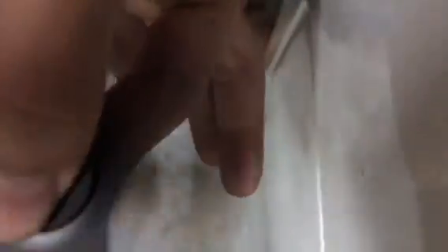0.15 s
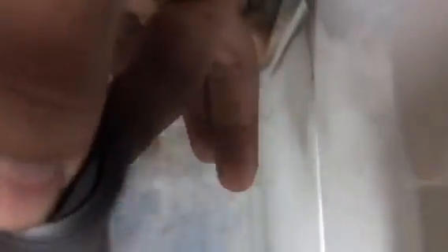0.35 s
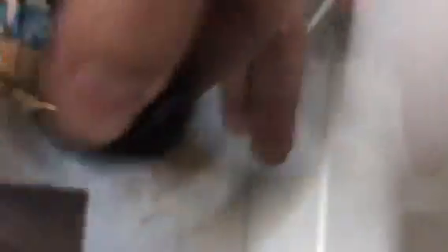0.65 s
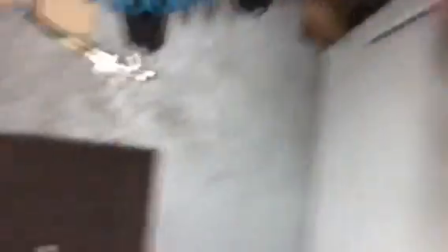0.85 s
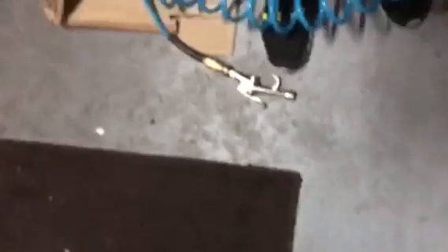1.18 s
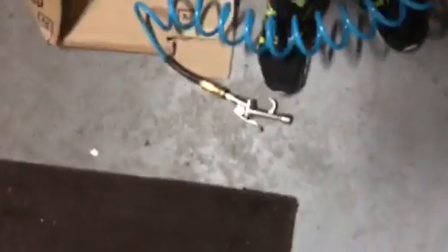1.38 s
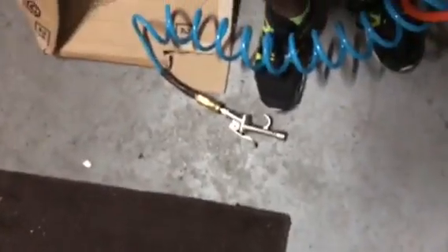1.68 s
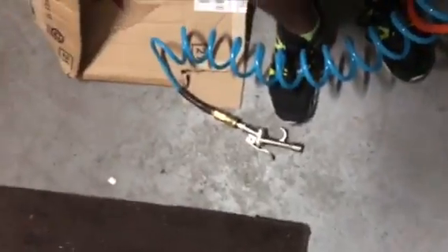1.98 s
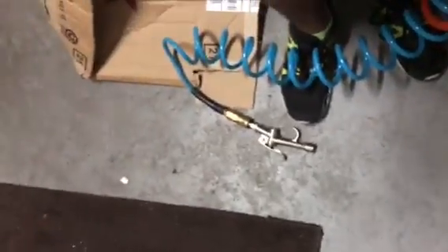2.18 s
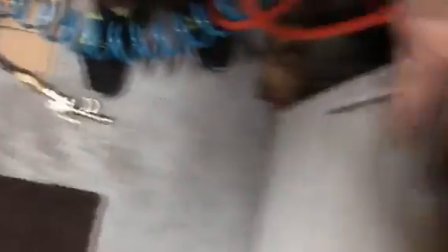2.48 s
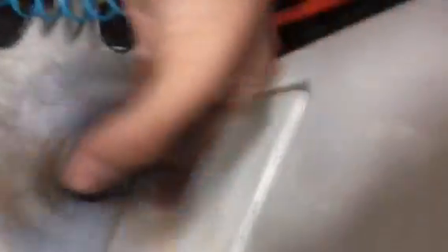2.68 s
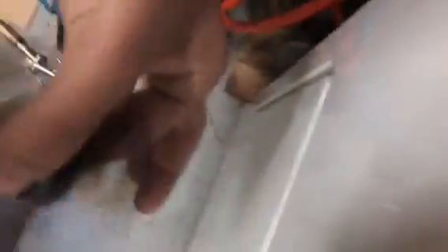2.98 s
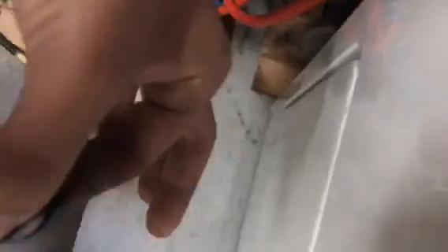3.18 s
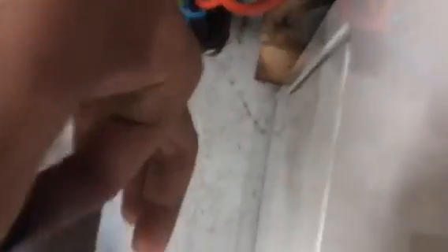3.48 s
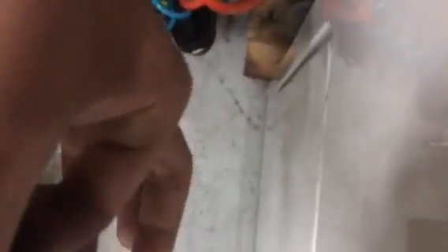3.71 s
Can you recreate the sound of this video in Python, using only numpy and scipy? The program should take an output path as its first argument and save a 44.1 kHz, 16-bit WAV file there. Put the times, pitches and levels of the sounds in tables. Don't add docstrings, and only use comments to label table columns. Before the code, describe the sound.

Fidget spinner coasting down: low fluttering hum, bright bearing hiss and ticks, late sharp plastic knock.

```python
import sys
import numpy as np
from scipy import signal
from scipy.io import wavfile

SR = 44100
rng = np.random.default_rng(int(sys.argv[2]) if len(sys.argv) > 2 else 0)


def waveform_to_disk(signal):
    frames = np.transpose(np.atleast_2d(signal))
    scaled = np.clip(frames, -1, 1) * 32767
    samples = np.round(scaled).astype(np.int16)
    wavfile.write(sys.argv[1], SR, samples)


def decibels_to_gain(level_db):
    exponent = np.asarray(level_db, float) / 20
    return 10 ** exponent


N = 169785
NEAR_DB, RING_LOW_HZ = -49.5, 3750


def rms_one(x):
    return x / np.sqrt(np.mean(x ** 2) + 1e-20)


def in_time(rows):
    s, *columns = np.transpose(rows)
    return [np.interp(np.arange(N) / SR, s, c) for c in columns]


def drift(rate):
    r = np.exp(-80 * np.pi * rate / SR)
    slow = signal.lfilter([1], [1, -2 * r, r * r], rng.standard_normal(N // 40 + 2002))[2000:]
    return np.interp(np.arange(N) / 40, np.arange(len(slow)), rms_one(slow))


def butter(x, order, hz, kind):
    return signal.sosfilt(signal.butter(order, hz, kind, fs=SR, output="sos"), x)


def resonance(hz, width_hz):
    r = np.exp(-np.pi * width_hz / SR)
    return (1 - r * r) / 2 * np.array([1, 0, -1]), [1, -2 * r * np.cos(2 * np.pi * hz / SR), r * r]


def ring(clicks, hz, t60):
    r, w = decibels_to_gain(-60 / (t60 * SR)), 2 * np.pi * hz / SR
    return signal.lfilter([0, np.sin(w)], [1, -2 * r * np.cos(w), r * r], clicks + 1e-18)


def colour(spectrum, patchy_db):
    sources = rng.standard_normal((2, N))
    hz, db = np.transpose(spectrum)
    out, edges = 0, 35 * 2 ** np.arange(0, 9.1, 1 / 3)
    for k, (low, high) in enumerate(zip(edges, edges[1:])):
        if high > hz[0] and low < hz[-1]:
            band = butter(sources[k % 2], 2, [low, high], "band")
            band_db = np.interp(np.log(low * high) / 2, np.log(hz), db)
            out = out + band * decibels_to_gain(band_db + patchy_db * drift(10.0))
    return rms_one(out)


def shop():
    # (frequency [Hz], density [dB per Hz])
    shop_spectrum = [(45, 0), (82, -2.5), (170, -30), (400, -32), (1000, -23.5), (2700, -34), (5800, -31.5),
                     (15500, -34.5)]
    return decibels_to_gain(-59.5) * colour(shop_spectrum, patchy_db=-1.1)


def rumbles():
    # (start [s], length [s], centre [Hz], width [Hz], level [dB])
    swells = [
        (0.247, 0.19, 55, 53, -43.5),
        (1.646, 0.83, 84.7, 4.2, -58),
        (2.793, 0.25, 85.3, 11, -55),
        (3.564, 0.22, 62, 40, -47.5),
    ]
    t, out = np.arange(N) / SR, 0
    for s, length, hz, width_hz, db in swells:
        b, a = resonance(hz, width_hz)
        noise = rms_one(signal.lfilter(b, a, signal.lfilter(b, a, rng.standard_normal(N))))
        out = out + decibels_to_gain(db) * np.sin(np.pi * np.clip((t - s) / length, 0, 1)) * noise
    return out


def room_tail(pushes):
    t60_s, rise_s = 0.21, 0.0052
    age = np.arange(SR // 2) / SR
    echo = rng.standard_normal(len(age)) * decibels_to_gain(-60 * age / t60_s) * np.clip(age / rise_s, 0, 1)
    echo = butter(echo, 2, [350, 1230], "band")
    return decibels_to_gain(4) * signal.fftconvolve(pushes, echo / np.linalg.norm(echo))[:N]


def knocks():
    # (time [s], peak [dB], softness cut [Hz], tilt [dB per octave])
    contacts = [(3.3867, -25, 2510, -1.5), (3.3883, -10, 11700, -0.15), (3.4037, -40, 1500, -5),
                (3.415, -48, 1800, -10), (3.429, -49, 1800, 0), (3.445, -54, 1800, -5),
                (3.4606, -29.5, 3180, -2), (3.4662, -34, 1200, 5), (3.554, -38, 790, -1),
                (3.587, -39, 1500, 2), (3.596, -45, 2500, 8), (3.631, -40, 706, -2.5),
                (3.663, -44, 680, -3), (3.69, -45, 690, 0)]
    # (frequency [Hz], level [dB], t60 [s])
    modes = [(280, -15, 0.043), (429, 0, 0.029), (722, -7, 0.0058), (875, -3, 0.0067), (980, -28, 0.03),
             (1300, -12, 0.004), (1790, -6.5, 0.0069), (2400, -9, 0.0074), (3640, -3.5, 0.0025),
             (4720, -31, 0.056), (4220, -24, 0.064), (6600, -15, 0.0063), (9150, -14, 0.0017),
             (13600, -17, 0.0015)]
    crack_db, crack_t60_s = -15, 0.0095
    bend_lag_s, bend_power, bend_most_s = 0.0029, 5.16, .004
    rebound_s, rebound_share = .00188, .45
    size = SR // 8
    struck, pushes = np.zeros((2, N + SR))
    for s, db, cut_hz, tilt_db in contacts:
        start = int(s * SR)
        r, push = np.exp(-2 * np.pi * cut_hz / SR), np.zeros(size)
        push[:300] = decibels_to_gain(db) * (1 - r) ** 2 * np.arange(1, 301) * r ** np.arange(300)
        pushes[start:start + size] += push
        crack = rng.standard_normal(size) * decibels_to_gain(db + crack_db - 60 * np.arange(size) / SR / crack_t60_s)
        struck[start:start + size] += signal.lfilter([0, 1 - r], [1, -r], crack)
        for k, (hz, level_db, t60) in enumerate(modes):
            lag_s = min(bend_lag_s * (400 / hz) ** bend_power, bend_most_s)
            i = int((s + lag_s) * SR)
            mode_gain = (-1) ** k * decibels_to_gain(level_db + tilt_db * np.log2(hz / 1000))
            struck[i:i + size] -= mode_gain * ring(push, hz, t60)
    back = butter(struck + 1e-18, 2, 2300, "low")
    struck = struck - rebound_share * np.roll(back, int(rebound_s * SR))
    return struck[:N] + room_tail(pushes)


def draught(level_db):
    # (frequency [Hz], density [dB per Hz])
    flow_spectrum = [(40, 2), (60, -14), (100, 5.5), (150, -0.5), (350, -8), (600, -19.5), (1500, -24.5),
                     (3000, -33)]
    return decibels_to_gain(level_db) * colour(flow_spectrum, patchy_db=2.0)


def raps():
    # (time [s], peak [dB], ring [Hz])
    ball_raps = [(0.0293, -28, 8700), (0.0603, -33, 8400), (0.0837, -33, 8000), (0.1615, -38, 8200),
                 (0.1905, -28.5, 7650), (0.2399, -39, 7260), (0.3187, -37, 7960), (0.3716, -36, 6500),
                 (0.4354, -47, 7900), (0.4753, -28, 7800), (0.4988, -33, 8070), (0.5147, -24.5, 8050),
                 (0.5492, -27, 7920), (0.5696, -25, 8450), (0.605, -31, 8300), (0.6449, -27.5, 8100),
                 (0.6833, -33, 7800), (0.7098, -27.5, 8050), (0.7432, -24.5, 8030), (0.7901, -33, 6700),
                 (0.8036, -34, 7240), (0.8305, -32, 6740), (0.8714, -39, 7820), (0.8839, -28, 8160),
                 (1.0136, -53, 7120), (1.054, -34, 7500), (1.1054, -36, 7140), (1.3533, -42, 8100),
                 (1.3957, -43, 8000), (1.5035, -44, 6350), (2.1715, -45, 5300), (2.3456, -41, 7320),
                 (2.4074, -32, 8050), (2.5351, -35.5, 4540), (2.5551, -47, 6260), (2.5765, -40, 7040),
                 (2.6304, -33, 7150), (2.6728, -30.5, 8040), (2.7177, -29, 8050), (2.7437, -48, 6950),
                 (2.7626, -34, 7060), (2.7906, -46, 8050), (2.8245, -45, 8180), (2.8699, -34, 8200),
                 (2.9158, -45, 7930), (2.9517, -43, 7240), (2.9981, -35, 7000), (3.0435, -35, 6860),
                 (3.0664, -47, 6790), (3.1428, -37, 7050), (3.2251, -38, 8060), (3.256, -35, 7840),
                 (3.2715, -34, 7100), (3.2999, -35, 7960), (3.3174, -34, 8100), (3.3453, -37, 7900),
                 (3.441, -35, 8330), (3.4632, -33, 8300), (3.474, -36, 8500), (3.49, -36, 7210),
            (3.5224, -46, 7320), (3.6166, -34, 7110), (3.634, -40, 8200), (3.6656, -36, 7840),
            (3.681, -34, 7840), (3.6994, -48, 8100), (3.8404, -34, 8000)]
    ring_t60_s, snap_db = .004, -4
    race_hz, race_db, race_t60_s = 4550, -17, 0.0067
    out = np.zeros(N + SR)
    for s, db, hz in ball_raps:
        click = np.zeros(600)
        click[0] = decibels_to_gain(db - 4)
        snap = decibels_to_gain(snap_db) * np.diff(click, prepend=0)
        race = decibels_to_gain(race_db) * ring(click, race_hz, race_t60_s)
        i = int(s * SR)
        out[i:i + 600] += ring(click, hz, ring_t60_s) + snap + race
    return butter(out[:N] + 1e-18, 2, RING_LOW_HZ, "high")


def ball_ticks(turns, level_db):
    cage_swing = [(1, 0.29, 0.17), (2, 0.47, 2), (3, 0.22, 0.087), (4, 0.76, 1.9), (5, 0.25, 2.68)]
    # (frequency [Hz], level [dB], t60 [s], share of the distance swing [-])
    race_rings = [(4460, -3, 0.0027, 0.46), (5430, -12.5, 0.0045, 0.22), (6370, 0.5, 0.0021, 1.06),
                  (6230, -3.5, 0.0033, 1.1), (8050, -6, 0.0048, 1.02), (8730, 2.5, 0.0012, 0.88),
                  (13700, 2, 0.0012, 0.91)]
    ticks_per_s, tick_spread_db, ring_spread_db = 550, 3.2, 4
    cage = 2 * np.pi * .1715 * turns
    bunch = np.exp(sum(depth * np.cos(k * cage + phase) for k, depth, phase in cage_swing))
    at = np.flatnonzero(rng.random(N) < ticks_per_s * bunch / bunch.mean() / SR)
    sizes = decibels_to_gain(tick_spread_db * np.minimum(rng.exponential(1, N), 1.5))
    ticks, power = 0, 0
    for hz, db, t60, share in race_rings:
        clicks = np.zeros(N)
        heights = sizes * decibels_to_gain(db + ring_spread_db * rng.standard_normal(N)) * rng.choice([-1, 1], N)
        clicks[at] = heights[at]
        rung = signal.lfilter(*resonance(hz, 10600), ring(clicks, hz, t60))
        rung = decibels_to_gain(1.6 * drift(2.4)) * rung
        ticks = ticks + decibels_to_gain(share * (level_db - NEAR_DB)) * rung
        power = power + np.mean(rung ** 2)
    return butter(ticks, 4, RING_LOW_HZ, "high") / np.sqrt(power)


def bearing(turns, level_db):
    # (frequency [Hz], density [dB per Hz])
    roll_spectrum = [(3000, -11.5), (4300, -12.5), (6300, -5), (8000, -7.5), (10300, -5.5), (13000, -5.5),
                     (16000, -8.5)]
    tick_db, roll_db = -5, -6
    hiss = decibels_to_gain(level_db + roll_db) * colour(roll_spectrum, patchy_db=1.5)
    return decibels_to_gain(NEAR_DB + tick_db) * ball_ticks(turns, level_db) + hiss


def hollow(x):
    # (time [s], resonance [Hz])
    cavity = [(0, 8140), (.78, 7700), (.84, 7050), (.9, 8100), (1.0, 7150), (1.44, 7700), (2.1, 6570),
              (2.3, 7300), (2.4, 7400), (2.55, 7000), (2.7, 7400), (2.9, 7600), (3.1, 7150), (3.4, 7500),
              (3.6, 7070), (3.85, 7660)]
    centre_hz, = in_time(cavity)
    out, state = x.copy(), np.zeros(2)
    for i in range(0, N, 256):
        lift, state = signal.lfilter(*resonance(centre_hz[i], 650), x[i:i + 256], zi=state)
        out[i:i + 256] += decibels_to_gain(6) * lift
    return out * np.std(x) / np.std(out)


def wobbles(turns):
    # (start [s], length [s], offset above hum [Hz], level [dB])
    side_tones = [
        (0, 0.097, 19.7, -44),
        (0.346, 0.047, 12, -32),
        (0.54, 0.16, 21.2, -38),
        (2.642, 0.34, 18.4, -48),
        (2.901, 0.073, 16.5, -41.5),
        (3.186, 0.34, 19.6, -47),
        (3.72, 0.44, 15, -43.5),
    ]
    t, out = np.arange(N) / SR, 0
    for s, length, above_hz, db in side_tones:
        swell = np.sqrt(np.sin(np.pi * np.clip((t - s) / length, 0, 1)) + 1e-12)
        out = out + decibels_to_gain(db) * np.sqrt(2) * swell * np.cos(2 * np.pi * (turns + above_hz * t))
    return out


def stalls():
    # (centre [s], half length [s], level change [dB])
    dips = [
        (0.101, 0.032, -10),
        (0.222, 0.021, -21),
        (0.332, 0.041, -15),
        (.41, 0.02, -2),
        (0.543, 0.024, -2.5),
        (0.607, 0.013, -12),
        (0.664, 0.023, -16),
        (0.792, 0.012, -10),
        (0.872, 0.013, -2),
        (3.516, 0.017, 4),
    ]
    t = np.arange(N) / SR
    return sum(db * np.cos(np.pi / 2 * np.clip((t - s) / half, -1, 1)) ** 2 for s, half, db in dips)


def hum(turns, turbulence, level_db):
    out = 0
    for multiple, db in [(1, 0), (2, -12.5), (3, -77), (1 / 3, -51)]:
        share = turbulence
        rate = 7.8
        if multiple > 1:
            share = np.maximum(turbulence, 0.49)
            rate = 26.4
            db = db + 0.2 * (level_db - level_db.max())
        eddy = (drift(rate) + 1j * drift(rate)) / np.sqrt(2)
        shake = np.sqrt(1 - share ** 2) + share * eddy
        out = out + decibels_to_gain(db) * np.sqrt(2) * np.real(shake * np.exp(2j * np.pi * multiple * turns))
    return out


def scene():
    # (time [s], hum [dB], bearing [dB], draught [dB], turbulence [0-1])
    nearness = [(0, -38.5, -48.5, -43, 0.53), (.28, -32, -49, -41.5, 0), (.47, -40, -49, -42.5, 0.5),
                (.64, -34, -49.5, -42.5, 0.3), (.72, -36.5, -49, -42.5, 0), (.92, -41, -48.5, -47.5, 0.44),
                (1.0, -42.5, -54.5, -54.5, 0.75), (1.2, -48.5, -59, -61, 0.6),
                (1.4, -46, -69.5, -59.5, 0.13), (2.33, -49, -62.5, -61.5, 0.34),
                (2.42, -46.5, -55, -61, 0.57), (2.64, -51, -54, -52, 0.37), (2.85, -45.5, -57, -54.5, 0.63),
                (3.1, -42, -57.5, -53.5, 0.35), (3.35, -41.5, -54, -50.5, 0.56),
                (3.52, -50, -54.5, -47.5, 0.53), (3.66, -44, -54.5, -47, 0.1),
                (3.85, -37.5, -55, -53.5, 0.65)]
    start_hz, drag_per_s = 152.5, .0635
    turns = start_hz / drag_per_s * np.log(1 + drag_per_s * np.arange(N) / SR)
    hum_db, bearing_db, draught_db, turbulence = in_time(nearness)
    background = shop() + rumbles() + knocks()
    air = draught(draught_db)
    balls = raps() + hollow(bearing(turns, bearing_db))
    lobes = wobbles(turns) + decibels_to_gain(hum_db + stalls()) * hum(turns, turbulence, hum_db)
    return (background + air + balls + lobes)[None]


def band_limit(x):
    return signal.sosfilt(signal.butter(12, 17040, fs=SR, output="sos"), x)


def record(dry):
    x = butter(dry, 4, 42, "high")
    x = x - 0.35 * signal.lfilter(*resonance(10500, 700), x)
    x = signal.sosfilt(signal.ellip(10, .5, 65, 15720, fs=SR, output="sos"), x)
    return band_limit(x)


dry = scene()
out = record(dry)
waveform_to_disk(out)
```